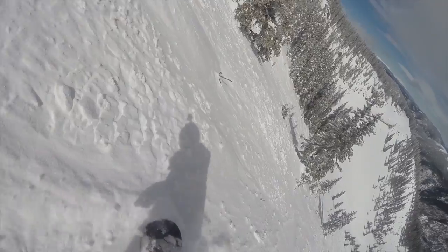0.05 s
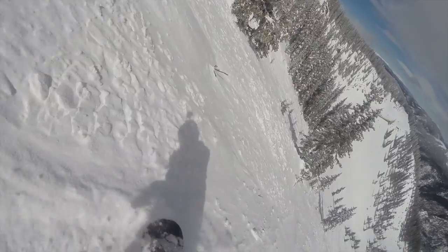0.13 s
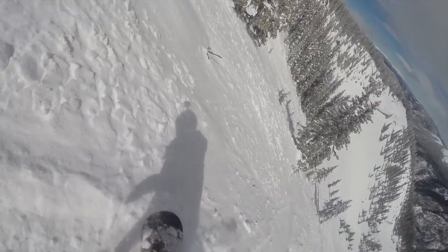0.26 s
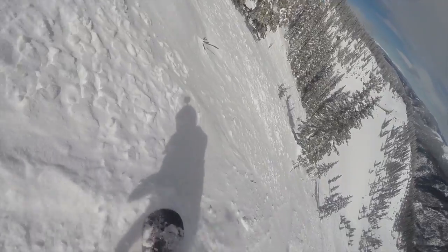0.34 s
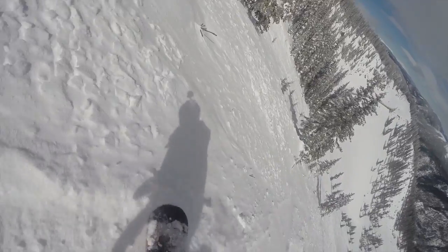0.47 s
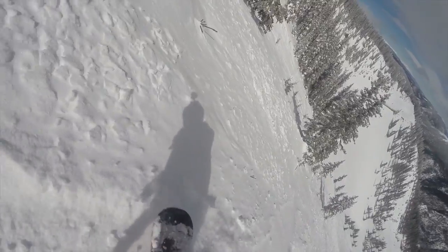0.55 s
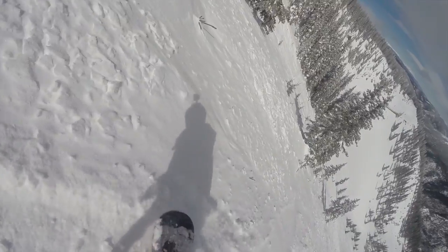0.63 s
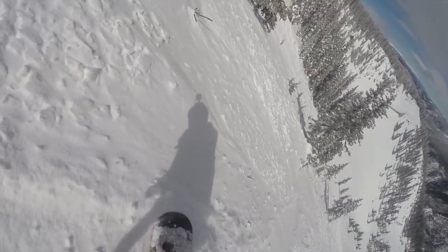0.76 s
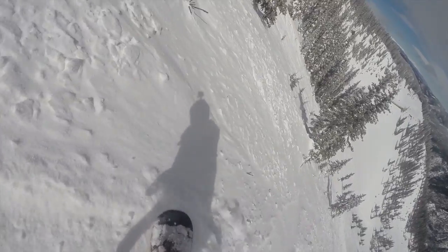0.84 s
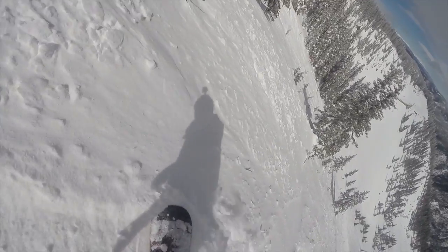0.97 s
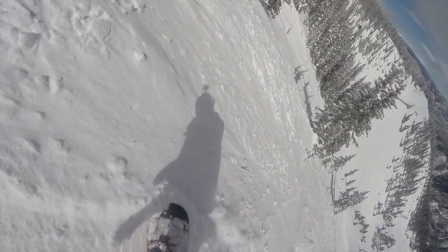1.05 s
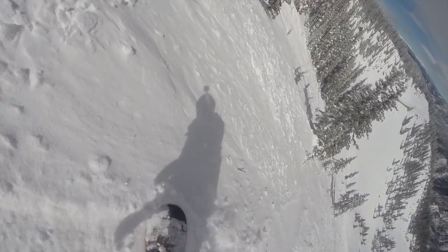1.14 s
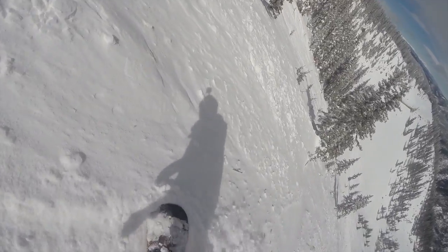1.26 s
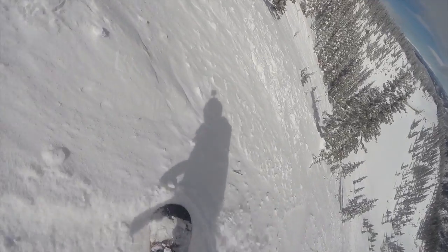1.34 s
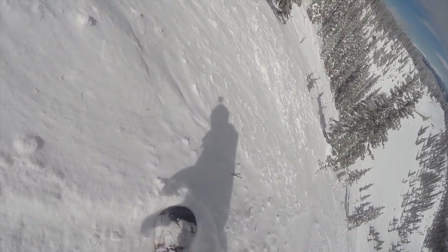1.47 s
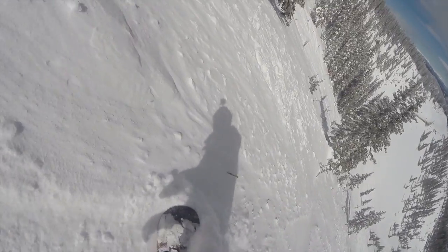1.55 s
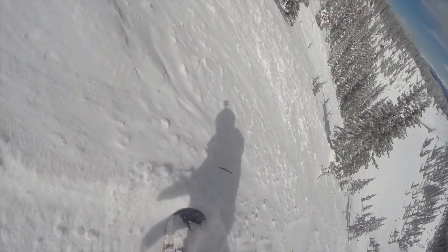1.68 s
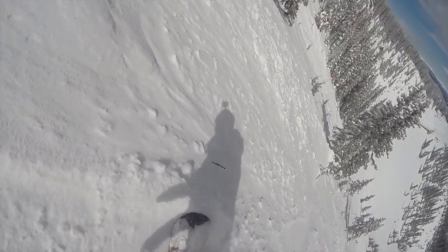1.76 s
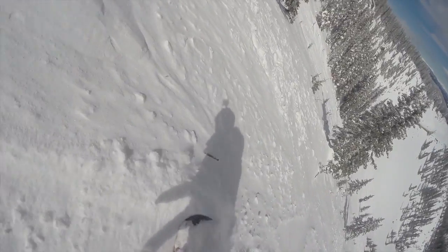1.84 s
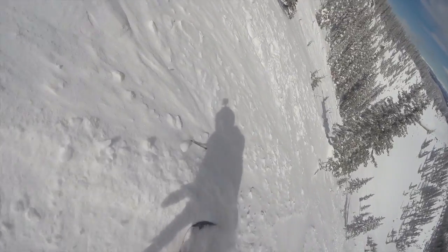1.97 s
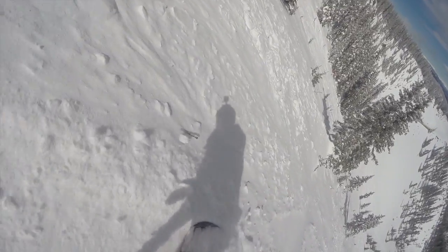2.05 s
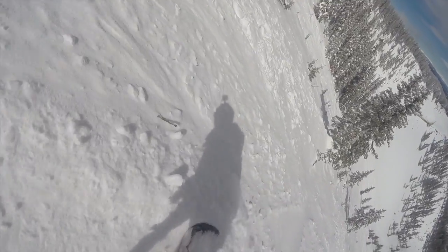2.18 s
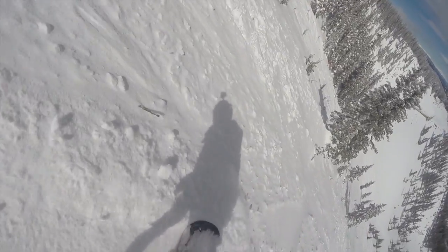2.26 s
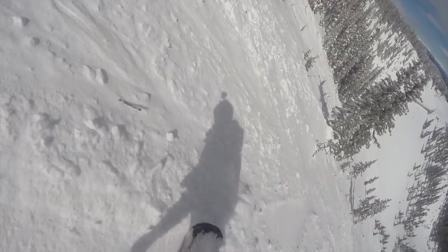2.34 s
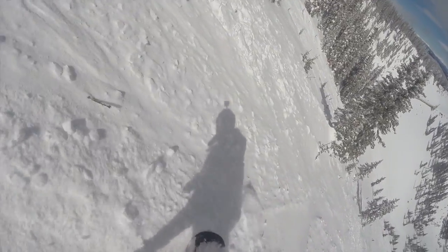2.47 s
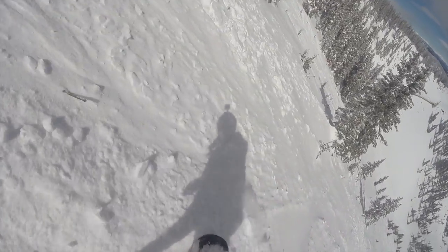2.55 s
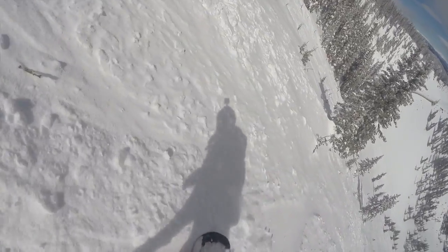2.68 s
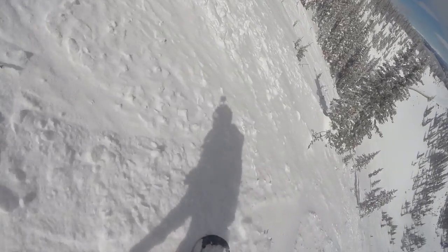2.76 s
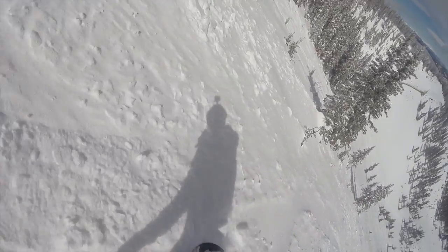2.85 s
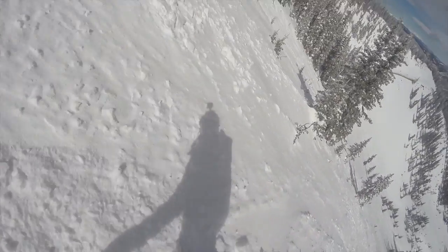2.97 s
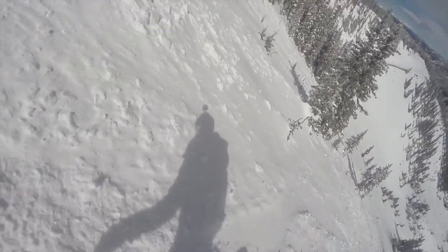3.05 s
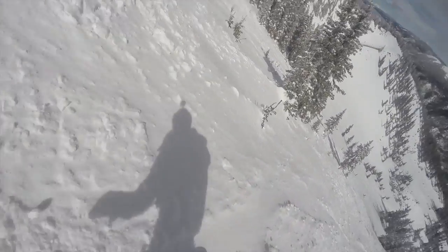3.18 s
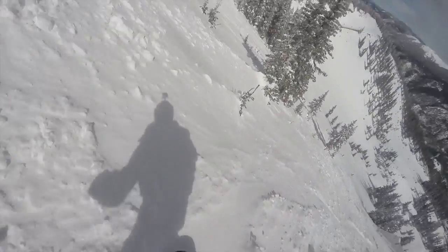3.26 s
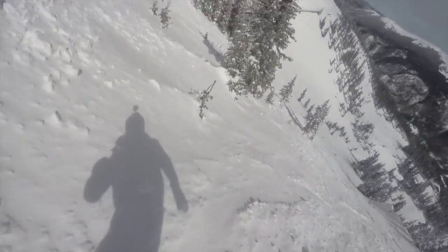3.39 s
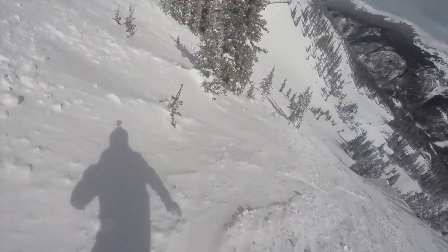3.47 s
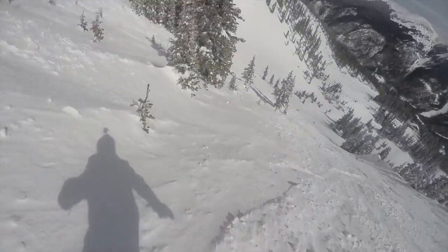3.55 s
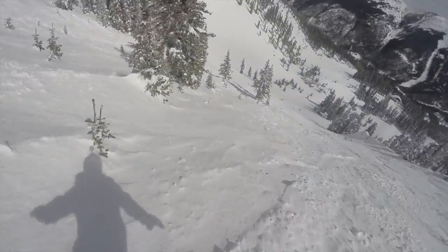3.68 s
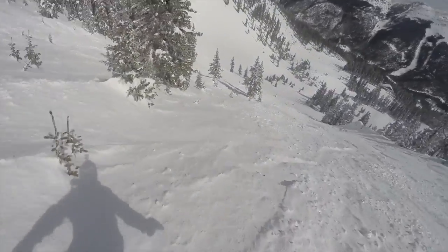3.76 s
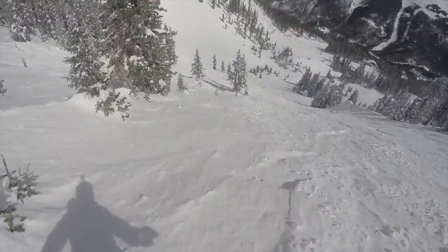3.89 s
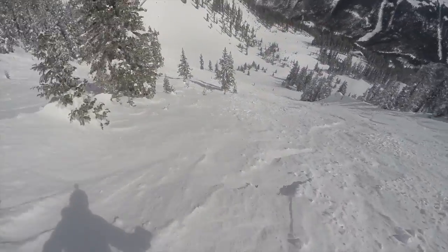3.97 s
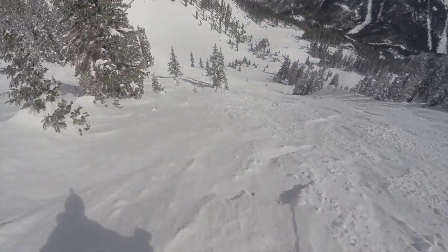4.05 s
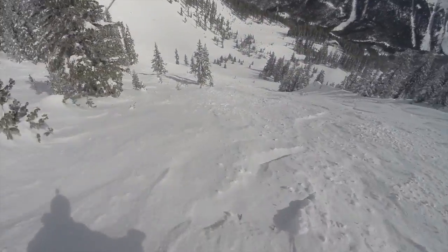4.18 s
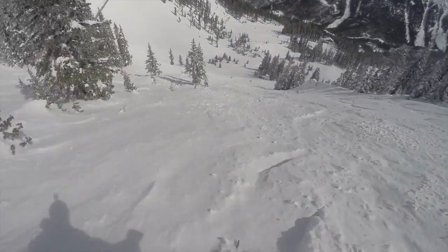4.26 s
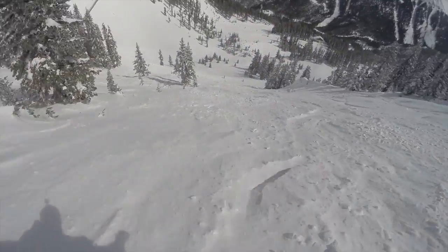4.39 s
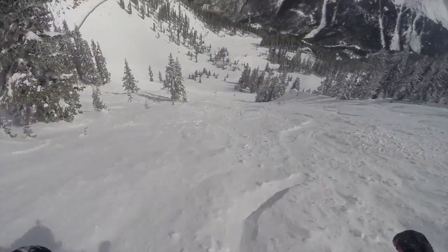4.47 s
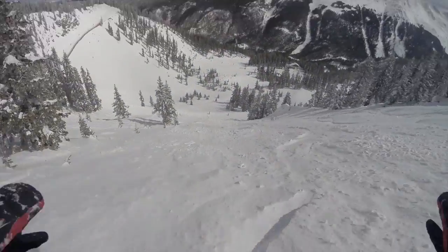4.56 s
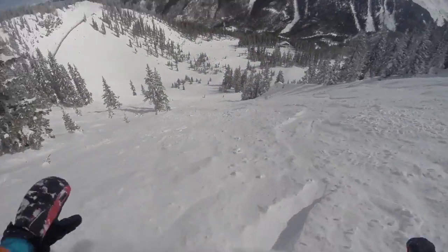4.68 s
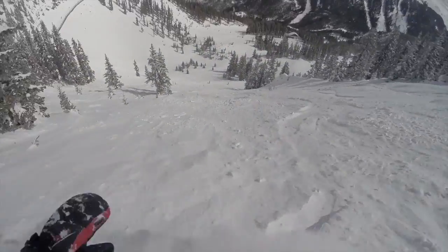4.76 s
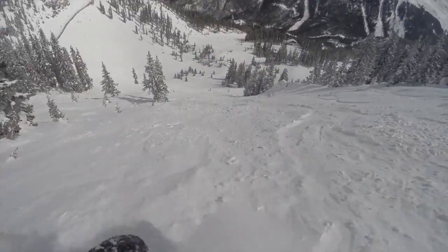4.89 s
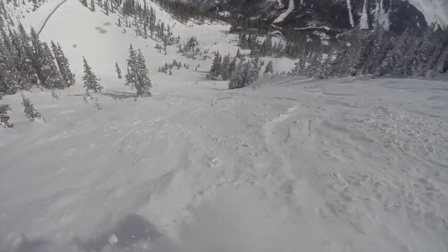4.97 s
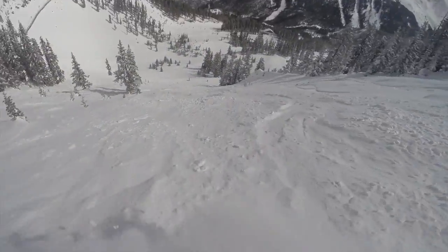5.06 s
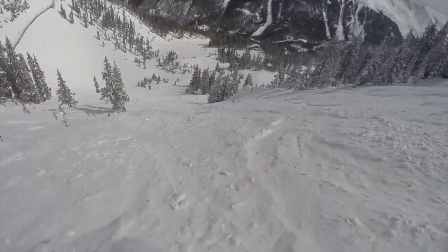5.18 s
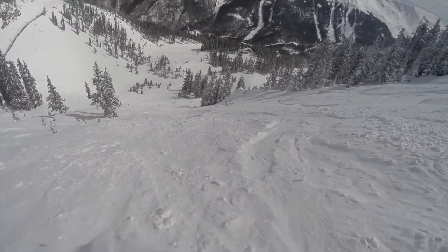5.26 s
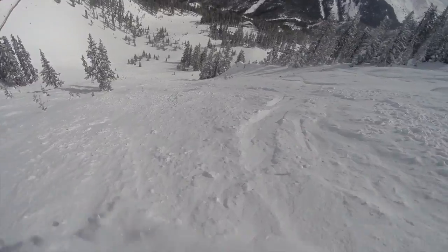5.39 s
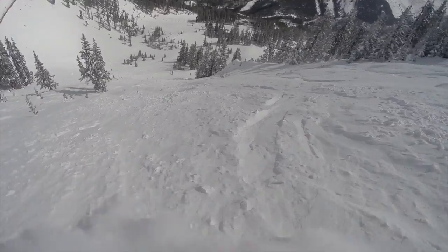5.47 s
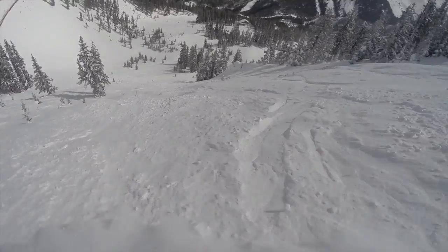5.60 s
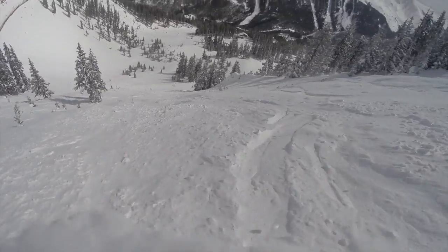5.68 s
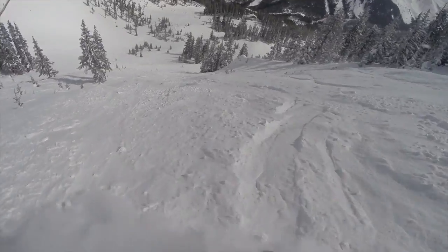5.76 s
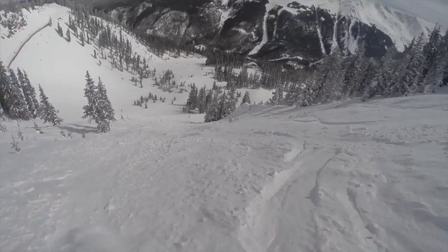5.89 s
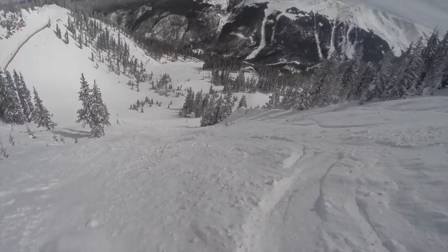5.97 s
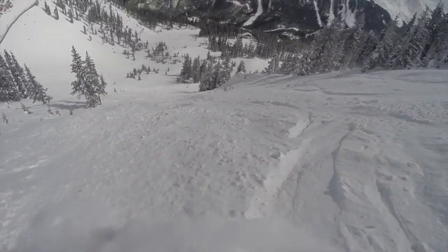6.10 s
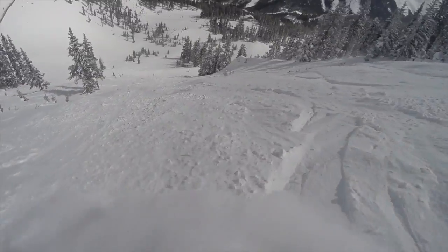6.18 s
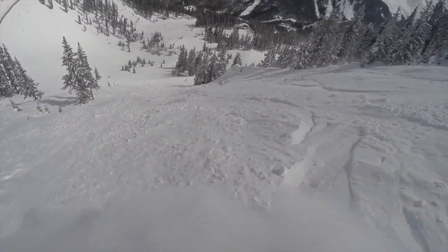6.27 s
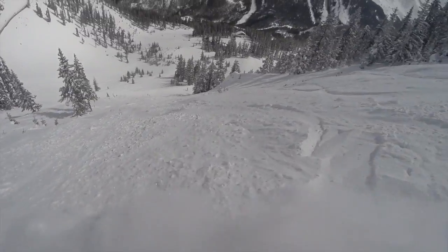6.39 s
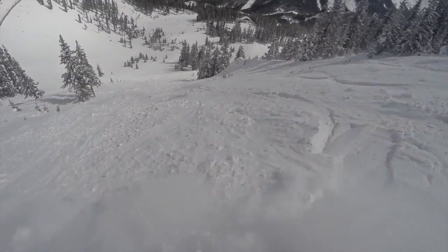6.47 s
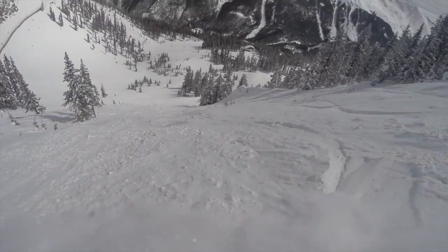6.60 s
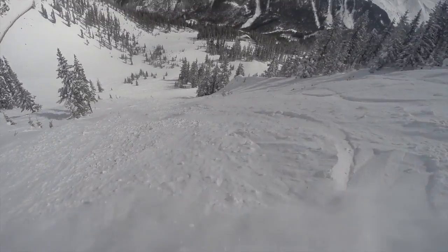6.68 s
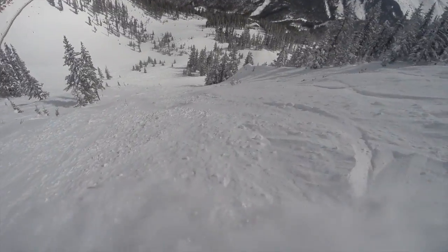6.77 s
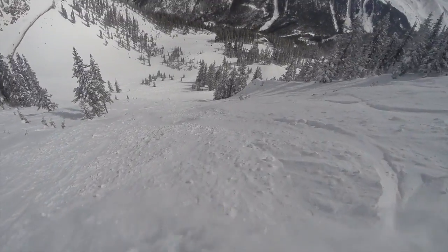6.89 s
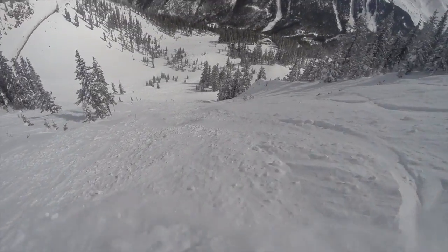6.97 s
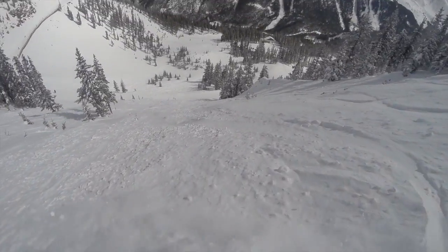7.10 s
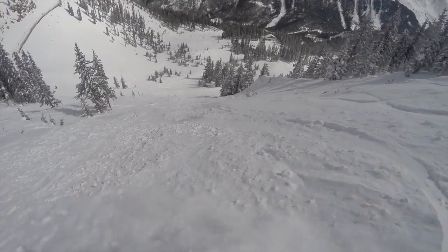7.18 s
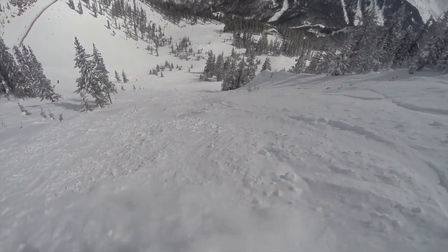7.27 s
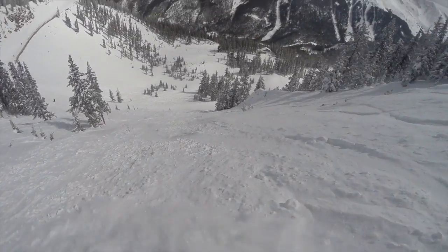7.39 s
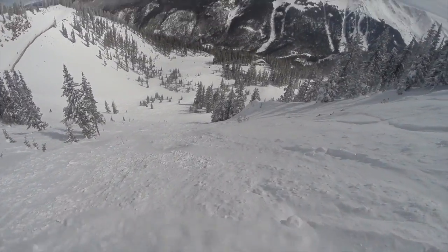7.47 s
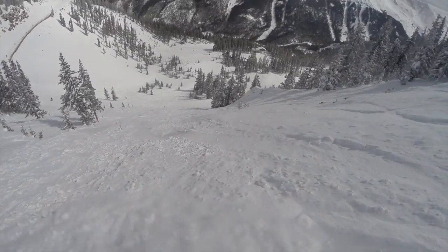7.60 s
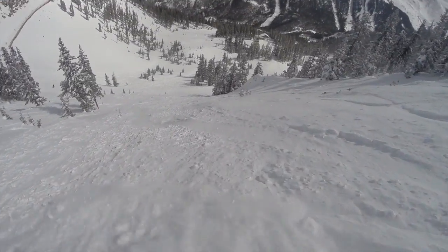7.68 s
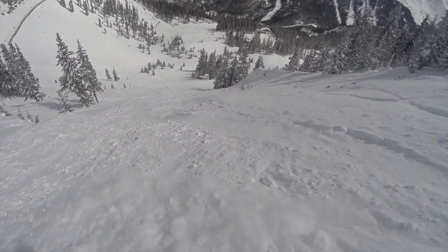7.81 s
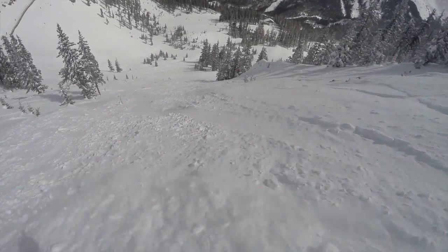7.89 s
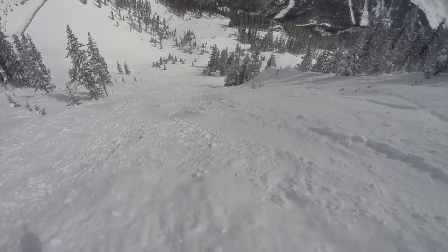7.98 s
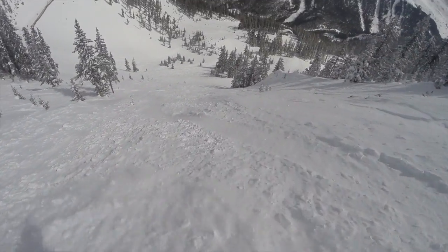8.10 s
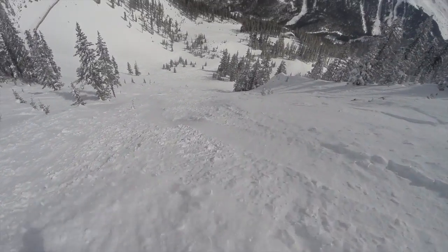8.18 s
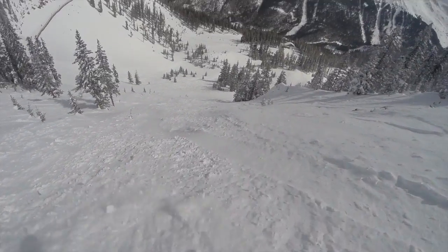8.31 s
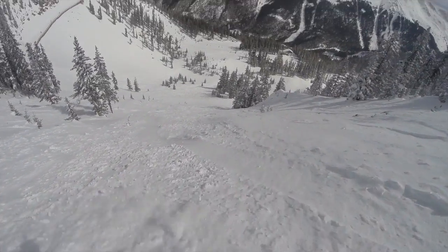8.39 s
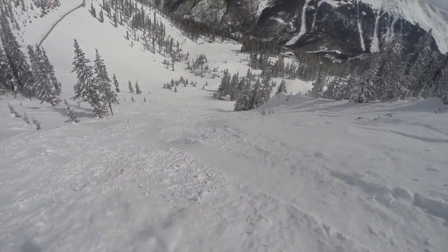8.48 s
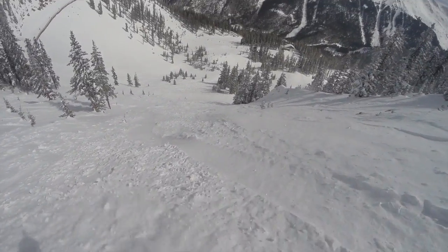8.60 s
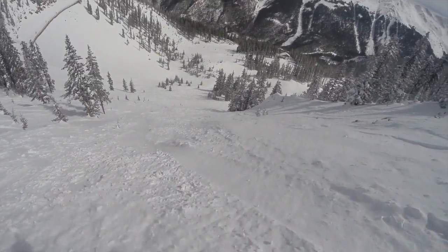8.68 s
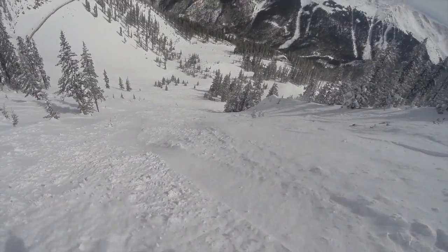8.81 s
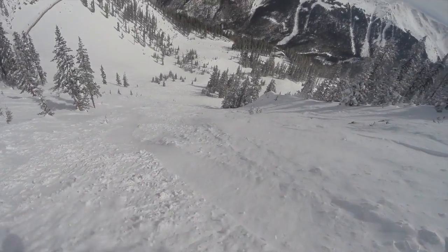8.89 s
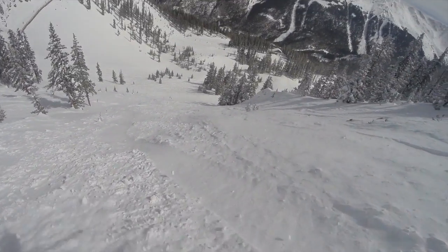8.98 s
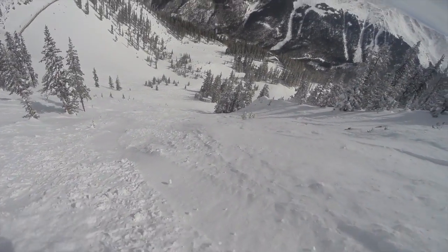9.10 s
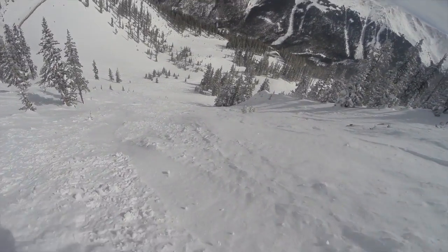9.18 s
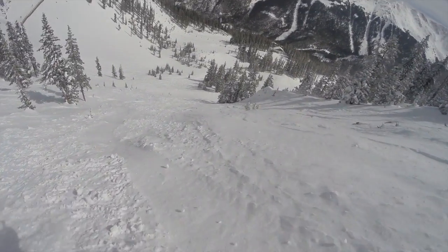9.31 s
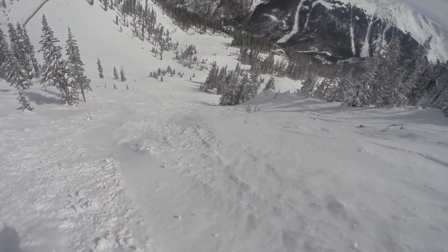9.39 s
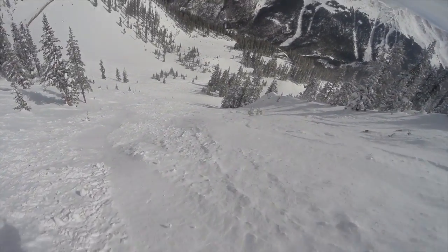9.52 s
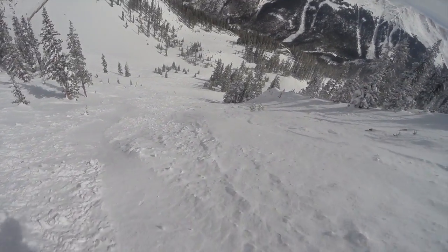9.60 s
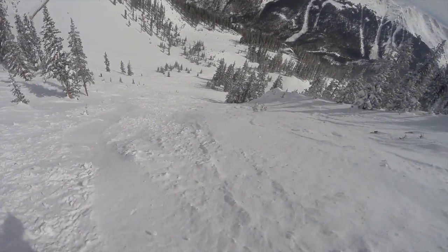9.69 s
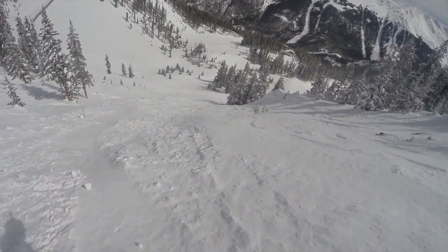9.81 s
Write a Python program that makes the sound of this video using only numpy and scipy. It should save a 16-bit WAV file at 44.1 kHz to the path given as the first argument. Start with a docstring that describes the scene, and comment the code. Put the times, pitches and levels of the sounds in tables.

```python
"""A snowboard's edge crushes snow, running quietly across a slope, then turning and side-slipping over chop.
Each breaking crystal is an impulse; thousands a second merge into a rasp, with a patter of fine spray.
The board thuds on ridges and sings briefly on crust, and thrown ice pellets ring the plastic case of a
helmet camera, whose mount knocks twice. Turbulent wind buffets the microphone port, over the camera's
own hiss and a faint electronic whine."""
import sys
import numpy as np
from scipy import signal
from scipy.fft import rfft, irfft, next_fast_len
from scipy.io import wavfile
from scipy.ndimage import uniform_filter1d

SR = 44100
rng = np.random.default_rng(int(sys.argv[2]) if len(sys.argv) > 2 else 0)


def wav_record(signal):
    """Record a signal, one row per channel, as 16-bit PCM in the file named by sys.argv[1]."""
    frames = np.transpose(np.atleast_2d(signal))
    bounded = np.clip(frames, -1, 1)
    # unit amplitude maps onto the largest positive 16-bit level
    quanta = np.round(bounded * 32767).astype(np.int16)
    wavfile.write(sys.argv[1], SR, quanta)


N = 434385

# the board's steady slide: time_s, crush_db, spray_db, rasp_re_crush_db
SLIDE_LEVELS = [(0, -70.5, -68.5, 9.5), (.4, -70, -70.5, 10.5), (1.1, -70, -72, 2.5),
                (1.75, -66.5, -71.5, 3.5), (2.4, -69, -72, 1.5), (3.1, -67.5, -71.5, 11.5),
                (3.3, -51, -66, 8.5), (3.5, -52, -70, 7.5), (3.8, -39.5, -66, -0.5), (3.95, -29, -51, -8),
                (4.13, -33, -54.5, -2), (4.47, -40, -53.5, -5), (4.7, -37, -46.5, -2.5),
                (4.9, -45, -57.5, 3), (5.2, -43, -44.5, -2.5), (5.5, -52.5, -57, 8), (5.8, -47, -54.5, 3),
                (5.95, -42.5, -46, -0.5), (6.2, -52, -54, 9), (6.45, -50, -57, -2), (7.1, -52, -59, 8),
                (7.55, -48.5, -61, -2), (7.95, -56, -68.5, 4), (8.38, -62.5, -64, 7.5),
                (8.9, -56.5, -66, 0.5), (9.15, -45.5, -56.5, 4.5), (9.45, -52, -68, 3),
                (9.85, -47.5, -64.5, 0)]
# the edge bites into ridges: start_s, hold_s, crush_db, spray_db
EDGE_BITES = [(3.543, 0.053, -47.5, -70), (4.167, 0.024, -31, -49), (4.248, 0.098, -30.5, -50),
              (4.25, 0.0057, -26, -53), (4.377, 0.063, -31, -53.5), (4.486, 0.041, -36.5, -57),
              (4.741, 0.0092, -28, -63), (4.946, 0.19, -35, -36), (5.26, 0.0091, -39, -55),
              (5.304, 0.046, -37.5, -43.5), (5.38, 0.09, -45, -48), (6.476, 0.034, -39.5, -56.5),
              (6.517, 0.057, -35, -45.5), (6.631, 0.015, -41, -47), (7.792, 0.043, -50, -73),
              (8.158, 0.033, -55.5, -78), (8.494, 0.038, -50.5, -68), (8.635, 0.12, -48, -67),
              (8.81, 0.036, -45, -76), (8.908, 0.037, -46.5, -61.5), (9.004, 0.014, -38.5, -66),
              (9.058, 0.0043, -30, -59), (9.514, 0.11, -47.5, -65), (9.716, 0.014, -39, -71),
              (9.752, 0.043, -41, -68)]
# spectrum of crushed snow: frequency_hz, relative_db
CRUSH_SPECTRUM = [(350, -44), (600, -7.5), (1140, 6), (1540, 0), (1860, 0), (3000, 2), (3590, 4.5),
                  (4030, -15), (4410, -8.5), (4880, -15), (5660, -16.5), (6260, -25), (9000, -31),
                  (11700, -57), (19800, -120)]
# spectrum of fine spray: frequency_hz, relative_db
SPRAY_SPECTRUM = [(2350, 4.5), (4000, -9.5), (4470, -4), (7020, -7.5), (13400, -12.5), (15700, -30.5),
                  (16000, -60.5)]
# a rasp that climbs as the turn tightens: time_s, pitch_hz, level_db
DIG_GLIDE = [(3.1, 1600, -65), (3.3, 1634, -54.5), (3.6, 1602, -45.5), (3.9, 1759, -46), (4.5, 2000, -51)]
# the edge sings on hard crust: time_s, pitch_hz, level_db
SQUEAL_GLIDE = [(9.17, 1890, -75), (9.21, 1853, -48), (9.29, 1715, -46), (9.31, 1460, -57),
                (9.44, 1390, -47.5), (9.5, 1380, -69)]
# a thin treble sizzle: time_s, level_db
SIZZLE_LEVELS = [(0, -87), (2.6, -76.5), (3.0, -84), (3.55, -76), (3.75, -62.5), (4.1, -54.5), (4.4, -71),
                 (4.8, -90)]
# ice striking the case: time_s, patch_peak_db, patch_hz, hollow_hz, hollow_re_patch_db
PELLET_HITS = [(0.2895, -42.5, 6000, 2100, 1), (0.68, -40.5, 6900, 3240, 3), (1.079, -52.5, 8000, 2980, 7),
               (2.1563, -47, 7960, 3000, -3), (3.303, -40.5, 7200, 4400, 4.5),
               (3.3435, -42, 4870, 3700, -8), (3.423, -47, 5550, 4200, -1), (3.6264, -33, 9450, 3000, -15),
               (4.0255, -30, 8820, 2500, 0), (4.063, -30.5, 8200, 3070, -11), (4.179, -15, 6000, 3160, -28),
               (4.354, -39, 9400, 3020, -10), (4.621, -28.5, 6580, 2590, 10),
               (4.9707, -29, 6400, 3360, 14.5), (5.0392, -17.5, 7900, 2300, -1.5),
               (5.0911, -4, 5670, 2440, -1), (5.1202, -12, 7000, 2870, 2), (5.122, -13.5, 7460, 4700, 7.5),
               (5.1379, -18.5, 9000, 4900, 10), (5.142, -19.5, 9000, 3420, 9), (5.156, -20, 9300, 5000, 1),
               (5.2121, -11, 6400, 2520, -1.5), (5.312, -18, 8200, 3150, 3),
               (5.3832, -6.5, 10400, 2870, -10), (5.401, -16, 5300, 2900, -10),
               (5.417, -16.5, 7350, 2680, 2.5), (5.4413, -21, 6040, 2920, -6),
               (5.486, -34, 9500, 3000, -15), (5.6487, -4, 6300, 3000, -6.5), (5.658, -20, 8100, 2700, 5),
               (5.6987, -24.5, 7550, 3000, -6), (5.845, -35, 8500, 3000, -16),
               (6.0322, -28.5, 5400, 3020, 2), (6.2232, -8, 5900, 3280, 0.5),
               (6.226, -11.5, 5360, 3280, -2), (6.5609, -7.5, 7840, 2800, -6.5),
               (6.639, -20, 8300, 2380, 5), (6.644, -22, 5460, 2950, -2), (6.6594, -27, 5800, 3400, -18),
               (6.701, -28.5, 7400, 2800, 7.5), (6.706, -33.5, 10000, 2000, 6),
               (6.7255, -31, 12000, 3000, -12), (6.7452, -28, 6560, 2650, 1),
               (6.774, -36.5, 5430, 3500, 9.5), (6.858, -36, 8100, 2680, -12), (6.861, -38, 12000, 2170, 8),
               (7.0206, -31.5, 8900, 3000, -12), (7.1424, -20.5, 7660, 3050, -4.5),
               (7.187, -39.5, 9500, 2570, 8), (7.4083, -33.5, 9000, 4300, -6), (7.62, -35.5, 9300, 4500, 4),
               (7.882, -47, 5600, 3000, -6), (7.9232, -40, 5160, 3040, -15), (8.4479, -43.5, 6900, 4800, 2),
               (8.614, -40, 6150, 2980, 7), (8.942, -40, 5150, 3000, -20), (9.1078, -34.5, 7400, 2980, -10),
               (9.2643, -37.5, 8800, 3000, -12)]
# resonances and one dip of the case: centre_hz, width_hz, boost_db
CASE_RESONANCES = [(1160, 260, -8), (1644, 420, 4), (2555, 370, 5), (3016, 105, 8), (4374, 180, 6),
                   (5580, 1400, 5.5), (7980, 400, 5.5)]
# the board strikes ridges: start_s, level_db
BOARD_THUDS = [(3.709, -25.5), (6.217, -27), (7.363, -27)]
# modes of the board: pitch_hz, relative_db, t60_s
BOARD_MODES = [(153, -6, 0.097), (314, -4.5, 0.05)]
# hollow knocks in the mount: start_s, level_db
MOUNT_KNOCKS = [(5.136, -24), (5.309, -33)]
# the mount's single mode: pitch_hz, relative_db, t60_s
MOUNT_MODES = [(811, -2.5, 0.096)]
# steady airflow: time_s, buffet_db, rumble_db
WIND_LEVELS = [(0, -35, -55.5), (.6, -40.5, -60), (1.4, -43, -60.5), (2.4, -37.5, -59), (3.05, -40, -57),
               (3.6, -35, -50), (3.95, -35.5, -40), (4.3, -30.5, -37.5), (4.55, -35, -45), (5.2, -36, -48),
               (6.4, -31, -50.5), (7.0, -44, -52.5), (7.45, -35, -52.5), (8.4, -40.5, -54),
               (8.9, -44.5, -55.5), (9.08, -36, -43.5), (9.3, -39.5, -55), (9.85, -42, -48.5)]
# gusts on the microphone port: start_s, hold_s, buffet_db, rumble_db
WIND_GUSTS = [(4.65, 0.1, -17.5, -43), (4.976, 0.075, -28, -42), (5.366, 0.19, -29.5, -56),
              (5.801, 0.12, -25, -51), (6.019, 0.023, -21, -45), (6.169, 0.02, -18.5, -44),
              (6.531, 0.069, -28.5, -45.5), (6.769, 0.04, -27, -52), (7.04, 0.043, -30, -52),
              (8.09, 0.036, -34.5, -55), (8.584, 0.082, -32.5, -52), (8.779, 0.022, -32, -58)]
# spectrum of eddy pressure: frequency_hz, relative_db
BUFFET_SPECTRUM = [(2.9, -27.5), (5.0, 2.5), (27, 6), (39, -12.5), (60, -17.5), (78, -43), (130, -120)]
# spectrum of wind rumble: frequency_hz, relative_db
RUMBLE_SPECTRUM = [(35, -52.5), (60, 1.5), (135, 0.5), (177, -4.5), (327, -6.5), (401, -14.5), (500, -15),
                   (650, -20), (1100, -120)]
# spectrum of electronic hiss: frequency_hz, relative_db
HISS_SPECTRUM = [(180, -35.5), (300, -2.5), (1210, -5.5), (3030, -23), (4090, -15.5), (7080, -23.5),
                 (10400, -19), (11500, -33), (13500, -23.5), (15200, -40.5), (16000, -88.5)]
# electronic tones: pitch_hz, rms_db
WHINE_TONES = [(10643, -81), (13189, -90)]

CHOP_S = 4.45  # smooth snow before, chopped snow after
PELLET_RISE_S = .0005


def edge():
    """Brittle fracture: crystals break in clumps under the edge; the finest spray patters on the case."""
    crush_db, spray_db = edge_levels()
    clumps = lumps(0.0088)
    clump_depth_db = np.where(np.arange(N) < CHOP_S * SR, .6, 1.6)
    fractures = grains(per_s=9000, spread_db=2.85) * gain_of(clump_depth_db * clumps)
    crush = patchy(coloured(fractures, CRUSH_SPECTRUM, CASE_RESONANCES), depth_db=1.3)
    rasp, swish = butterworth(crush, 4, 2200, "low"), butterworth(crush, 4, 2200, "high")
    lagging_db = uniform_filter1d(crush_db, round(.07 * SR))  # the whole board answers slowly
    rasp_db = lagging_db + curves(SLIDE_LEVELS)[2]
    patter = grains(per_s=5000, spread_db=3.3) * gain_of(2.6 * clumps)
    spray = coloured(patter, SPRAY_SPECTRUM, CASE_RESONANCES)
    spray = butterworth(spray, 4, 2600, "high")  # too light to move the case low down
    spray = patchy(spray, depth_db=3.9)
    return gain_of(rasp_db) * rasp + gain_of(crush_db) * swish + gain_of(spray_db) * spray


def edge_levels():
    """Power summation: the steady slide plus the bites gives the crush and spray levels in dB."""
    return swells(curves(SLIDE_LEVELS)[:2], EDGE_BITES, rise_s=0.0033, fall_db_per_s=1002)


def edge_dig():
    """Modulation: a carrier shifts dense snaps into a climbing band, heard only during the turn."""
    hz, db = curves(DIG_GLIDE)
    t = np.arange(N) / SR
    turning = (t > DIG_GLIDE[0][0]) * (t < DIG_GLIDE[-1][0])
    snaps = butterworth(grains(per_s=9000, spread_db=2.), 2, 190, "low")
    return gain_of(db) * turning * evened(snaps * carrier(hz))


def edge_squeal():
    """Random amplitude modulation: a sinking tone on crust spreads into a rough, broken band."""
    hz, db = curves(SQUEAL_GLIDE)
    roughness = evened(lumps(0.0017) * gain_of(4. * lumps(.012)))
    return gain_of(db) * roughness * np.sqrt(2) * carrier(hz)


def sizzle(centre_hz=7670, width_hz=1000):
    """Resonant filtering: dense tiny snaps merge into one narrow treble band."""
    snaps = grains(per_s=6000, spread_db=3.1)
    band = ring(ring(snaps, centre_hz, width_hz), centre_hz, width_hz)
    return gain_of(curves(SIZZLE_LEVELS)[0]) * evened(band)


def pellet(db, patch_hz, hollow_hz, hollow_db, noise):
    """Impact excitation: a shattering pellet rings a patch of the case, its hollow and its dull body."""
    t = np.arange(len(noise)) / SR
    decay = np.exp(-t / 0.00031) + 0.15 * np.exp(-t / 0.0016)
    burst = noise * decay * np.minimum(t / PELLET_RISE_S, 1) ** 4
    patch = ring(burst, patch_hz, 0.27 * patch_hz)
    hollow = ring(ring(burst, hollow_hz, 0.3 * hollow_hz), hollow_hz, 1.5 * hollow_hz)
    body = ring(ring(burst, 1850, 1300), 1850, 2500)
    snap = ring(burst, 4800, 8000)
    patch, hollow, body, snap = (part / abs(part).max() for part in (patch, hollow, body, snap))
    return gain_of(db) * (patch + 0.6 * snap + gain_of(hollow_db) * (hollow + 0.26 * body))


def pellets():
    """Shot noise: small hits come thicker and harder with the spray, beneath the distinct listed ones."""
    out = np.zeros(N)
    for (time_s, *hit), noise in zip(PELLET_HITS, rng.standard_normal((len(PELLET_HITS), 500))):
        add(out, time_s - PELLET_RISE_S, pellet(*hit, noise))
    excess_spray_db = np.maximum(edge_levels()[1] + 72, 0)
    for patch_hz in (5000, 6500, 8400, 8700, 10600):
        impacts = grains(per_s=2.2 + .95 * excess_spray_db, spread_db=2.4) * gain_of(.62 * excess_spray_db)
        tick = pellet(-58, patch_hz, hollow_hz=3300, hollow_db=-9, noise=rng.standard_normal(500))
        out += signal.oaconvolve(impacts, tick)[:N]
    return out


def blows(rows, modes, rise_s):
    """Free vibration: each blow sets the same damped modes of the board or mount ringing."""
    out, t = np.zeros(N), np.arange(SR // 5) / SR
    ringing = sum(gain_of(db - 60 * t / t60_s) * np.sin(2 * np.pi * hz * t) for hz, db, t60_s in modes)
    for start_s, db in rows:
        add(out, start_s, gain_of(db) * ringing * np.minimum(t / rise_s, 1))
    return out


def wind():
    """Turbulent pressure: eddies push on the microphone port; gusts and jolts rumble above them."""
    buffet_db, rumble_db = swells(curves(WIND_LEVELS), WIND_GUSTS, rise_s=0.014, fall_db_per_s=102)
    eddies = coloured(rng.standard_normal(N), BUFFET_SPECTRUM)
    local_rms = np.sqrt(abs(uniform_filter1d(eddies ** 2, 6000)))
    eddies = evened(eddies / (0.19 + local_rms))  # levelled, so the gusts set the swell
    jolts = rng.standard_normal(N) * gain_of(2.3 * lumps(0.015) + 1.1 * lumps(0.14))
    return gain_of(buffet_db) * eddies + gain_of(rumble_db) * coloured(jolts, RUMBLE_SPECTRUM)


def camera(hiss_db=-63.5):
    """Electronic self-noise: broadband hiss with thin steady tones."""
    t = np.arange(N) / SR
    hiss = patchy(coloured(rng.standard_normal(N), HISS_SPECTRUM), depth_db=0.99)
    whine = sum(gain_of(db) * np.sqrt(2) * np.sin(2 * np.pi * (hz * t + rng.random()))
                for hz, db in WHINE_TONES)
    return gain_of(hiss_db) * hiss + whine


def grains(per_s, spread_db):
    """A Poisson process: random snaps of either sign, a few much larger than the rest."""
    size = gain_of(spread_db * np.minimum(rng.exponential(1, N), 5))
    return size * rng.choice([-1., 1.], N) * (rng.random(N) < per_s / SR)


def lumps(seconds):
    """Correlated noise of unit rms, changing over about this time."""
    size = max(round(seconds * SR), 1)
    return evened(uniform_filter1d(uniform_filter1d(rng.standard_normal(N), size), size))


def swells(steady_db, rows, rise_s, fall_db_per_s):
    """Incoherent addition: events that rise, hold and fall add their power to each steady level."""
    t, powers = np.arange(SR // 2) / SR, gain_of(steady_db) ** 2
    for start_s, hold_s, *peaks_db in rows:
        fall = gain_of(-fall_db_per_s * np.maximum(t - rise_s - hold_s, 0))
        envelope = np.minimum(t / rise_s, 1) * fall
        for power, peak_db in zip(powers, peaks_db):
            add(power, start_s, (gain_of(peak_db) * envelope) ** 2)
    return 10 * np.log10(powers)


def coloured(x, spectrum, resonances=()):
    """Minimum-phase filtering: a spectrum and resonances act causally, as in a passive body; unit rms."""
    size = next_fast_len(len(x) + SR)
    hz = np.abs(np.fft.fftfreq(size, 1 / SR))
    points_hz, points_db = np.transpose(spectrum)
    level_db = np.interp(np.log(hz + 1), np.log(points_hz + 1), points_db)
    for centre_hz, width_hz, boost_db in resonances:
        level_db += boost_db / (1 + (2 * (hz - centre_hz) / width_hz) ** 2)
    log_gain = np.log(gain_of(np.maximum(level_db, -100)))
    response = np.exp(log_gain - 1j * np.imag(signal.hilbert(log_gain)))
    return evened(irfft(rfft(x, size) * response[:size // 2 + 1], size)[:len(x)])


def patchy(x, depth_db):
    """Spectral modulation: short patches of the spectrum rise and sink, so the colour flickers."""
    spectra = signal.stft(x, nperseg=512)[2]
    across_bands = uniform_filter1d(rng.standard_normal(spectra.shape), 4, axis=0)
    patches = evened(uniform_filter1d(across_bands, 5, axis=1))
    return evened(signal.istft(spectra * gain_of(depth_db * patches), nperseg=512)[1][:N])


def ring(x, hz, width_hz):
    """A damped two-pole resonance that passes no steady pressure."""
    radius = np.exp(-np.pi * width_hz / SR)
    angle = 2 * np.pi * min(hz, SR / 2.2) / SR
    return signal.lfilter([1, -1], [1, -2 * radius * np.cos(angle), radius * radius], x)


def butterworth(x, order, hz, kind):
    """A maximally flat low-pass or high-pass filter."""
    return signal.sosfilt(signal.butter(order, hz, kind, fs=SR, output="sos"), x)


def carrier(hz):
    """A gliding sine: phase is the integral of frequency."""
    return np.sin(2 * np.pi * np.cumsum(hz) / SR)


def curves(rows):
    """Linear interpolation of each column over time."""
    times_s, *columns = np.transpose(rows)
    return [np.interp(np.arange(N) / SR, times_s, column) for column in columns]


def add(mix, start_s, sound):
    """Superposes a sound on the mix."""
    part = mix[round(start_s * SR):][:len(sound)]
    part += sound[:len(part)]


def gain_of(db):
    """Decibels to amplitude."""
    return 10 ** (np.asarray(db) / 20)


def evened(x):
    """Normalises to unit rms."""
    return x / np.sqrt(np.mean(x ** 2) + 1e-20)


def scene():
    """Superposition: all sources sum at one microphone."""
    impacts = pellets() + blows(MOUNT_KNOCKS, MOUNT_MODES, rise_s=0.0034)
    impacts += blows(BOARD_THUDS, BOARD_MODES, rise_s=0.0062)
    return (wind() + edge() + edge_dig() + edge_squeal() + sizzle() + impacts + camera())[None]


def record(dry):
    """Band limiting and clipping: the top treble fades, full scale caps the peaks, a low-pass follows."""
    heard = butterworth(dry, 14, 14900, "low")
    band_limit = signal.firwin(511, 16600, window=("kaiser", 9), fs=SR)
    return signal.oaconvolve(np.clip(heard, -1, 1), band_limit[None], "same")


dry = scene()
out = record(dry)
wav_record(out)
```